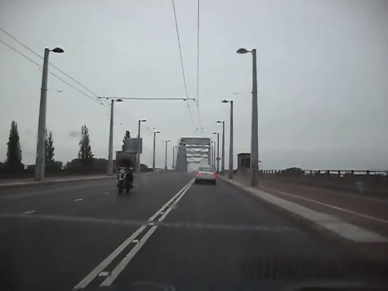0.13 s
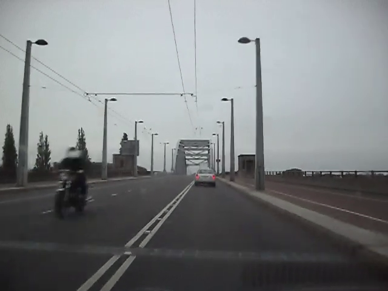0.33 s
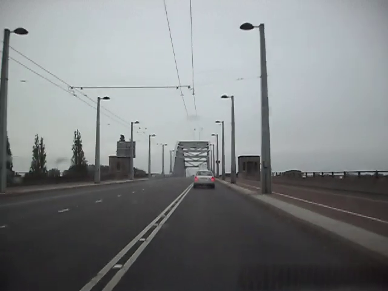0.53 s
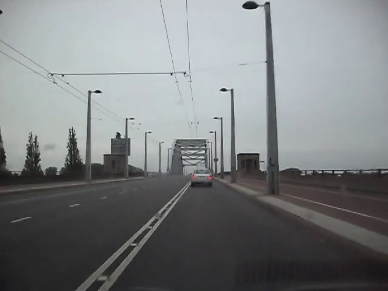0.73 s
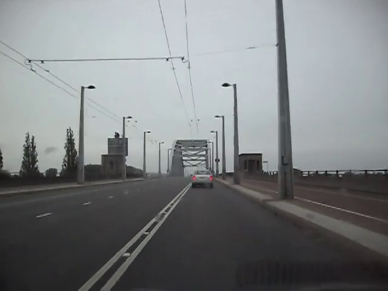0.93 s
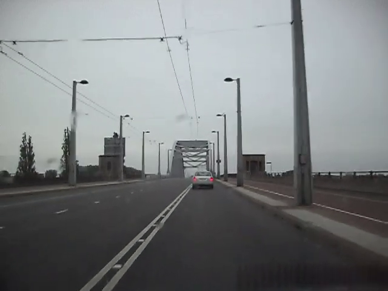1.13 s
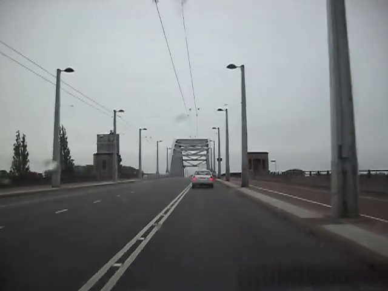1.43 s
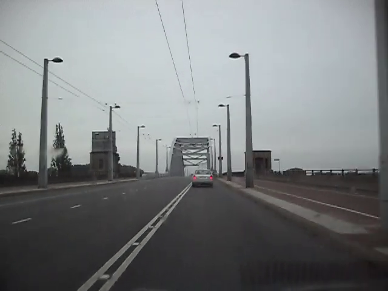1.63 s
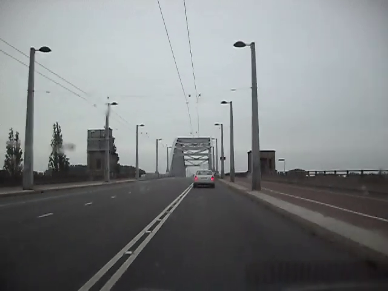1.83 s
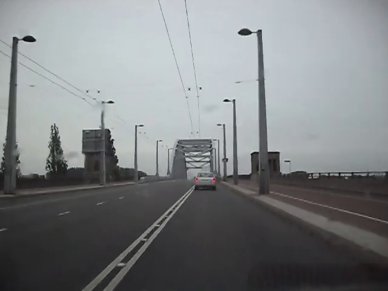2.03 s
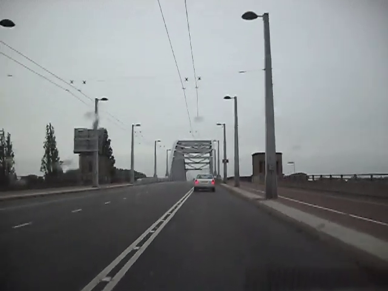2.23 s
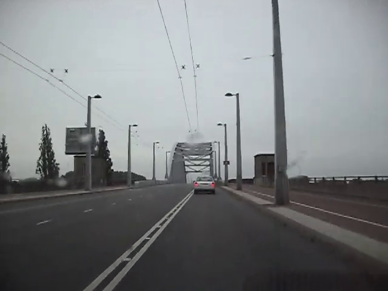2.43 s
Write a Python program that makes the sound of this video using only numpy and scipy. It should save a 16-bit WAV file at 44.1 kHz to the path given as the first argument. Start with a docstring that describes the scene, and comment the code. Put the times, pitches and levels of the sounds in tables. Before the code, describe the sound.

Car cabin driving noise: a steady low engine drone and dull tyre rumble throughout. Wheels hit road joints at about 0.25, 0.45, 0.75 and 0.95 seconds with deep booms and thuds; loose trim knocks near 0.47 and 1.0, the last bump strongest. A motorbike's faint hiss passes around 0.5, falling in pitch. Afterwards smoother rolling continues, with sparse raindrop ticks on glass, faint microphone hiss and thin whine.

```python
"""A steady engine drone over tyre rumble, then booms, rings and knocks as the wheels cross two road joints.
The place is the cabin of a four-cylinder car, cruising onto a bridge in light rain, microphone inside.
Sines make the engine, booms, thuds and trim modes; shaped noise makes the rumble, slaps and cracks.
An oncoming motorbike hisses past as a band of noise dropping in pitch; drops tick on the windscreen
as short noise bursts. The microphone adds hiss and a thin whine."""
import sys
import numpy as np
from scipy import signal
from scipy.fft import rfft, irfft
from scipy.io import wavfile

SR = 44100
rng = np.random.default_rng(int(sys.argv[2]) if len(sys.argv) > 2 else 0)


def put_to_file(sound):
    """Save the sound as 16-bit audio at rate SR, in the file named by the first command-line argument."""
    columns = np.atleast_2d(sound).T  # one column per channel
    safe = np.clip(columns, -1, 1)
    whole_steps = np.round(safe * 32767)
    wavfile.write(sys.argv[1], SR, whole_steps.astype(np.int16))


N = 114660
TIME = np.arange(N) / SR  # [s]

# All noise spectra below are relative: the noise is scaled to an rms of 1 before its level is set.
# microphone hiss spectrum: (frequency [Hz], level per Hz [dB])
HISS_SPECTRUM = [(500, 14), (3000, -4), (6500, 1), (8000, 1), (9800, 6), (11000, -4)]
# microphone hiss over time: (time [s], level [dB])
HISS_LEVEL = [(0, -57), (.4, -57.5), (1.0, -60), (1.15, -62), (2.2, -61.5), (2.6, -59.5)]
HISS_TOP_HZ, WHINE_HZ, WHINE_DB = 10350, 7170, -75

# single raindrops on the windscreen: (time [s], level [dB], treble tilt [dB])
DROPS = [(0.0575, -43.5, 3), (.216, -44.5, 4), (0.2837, -35.5, 0), (.505, -46, -16), (0.512, -43.5, 12),
         (.5525, -45, -5), (.8106, -43, -7), (0.84, -44.5, -1), (.9652, -45, 1), (1.28, -41, 5),
         (1.4223, -42.5, 0), (1.539, -44.5, -13), (1.5438, -45, 13), (1.6636, -45, -1), (1.675, -43.5, -3),
         (1.9301, -48.5, 2), (2.033, -47.5, 4), (2.058, -41, 0), (2.214, -44, -4), (2.263, -48, 0),
         (2.416, -47, -2), (2.53, -48.5, 13)]
# colour of a drop on the glass: (frequency [Hz], level per Hz [dB])
DROP_SPECTRUM = [(600, -21), (1500, 6), (3200, 5), (5000, -2), (7500, -3.5), (10500, -1.5)]
DROP_T60_S = 0.018
DRIZZLE_PER_S, DRIZZLE_DB, DRIZZLE_SPREAD_DB = 50, -61, 5.5

# passing motorbike: loudest moment and width, then the hiss and the spray
PASS_S, PASS_WIDTH_S = 0.49, 0.19
PASS_DB, PASS_HZ, PASS_BAND_HZ = -54, 2920, 680
SPRAY_DB, SPRAY_HZ, SPRAY_BAND_HZ = -7, 1900, 760  # level relative to the hiss
DOPPLER_SHARE, DOPPLER_S, DOPPLER_TURN_S = 0.115, 0.6, 0.088

# tyre rumble through the body: (frequency [Hz], level per Hz [dB])
RUMBLE_SPECTRUM = [(21, 4.5), (27, -4), (48, -2), (62, -2), (82, -13), (100, 0), (140, -8), (180, -13.5),
                   (250, -22.5), (400, -27.5), (560, -38.5)]
# rumble over time: (time [s], level [dB])
RUMBLE_LEVEL = [(0, -26), (.2, -34.5), (.3, -24), (.55, -30.5), (.67, -29.5), (.8, -26), (1.1, -28.5),
                (1.45, -33), (1.85, -30.5), (2.08, -33.5), (2.3, -31.5), (2.6, -29)]
# tread and wind noise: (frequency [Hz], level per Hz [dB])
TREAD_SPECTRUM = [(300, -3.5), (470, 5), (620, -2), (900, 1), (1300, -6.5), (2000, -11.5), (3200, -13.5),
                  (4500, -19), (10000, -25.5)]
# tread noise over time: (time [s], level [dB])
TREAD_LEVEL = [(0, -48), (.18, -46.5), (.27, -44), (.39, -47), (.55, -45), (.72, -46), (1.03, -47.5),
               (1.12, -51), (1.6, -49.5), (2.25, -51), (2.6, -48)]
# narrow resonances of the rolling tyres: (frequency [Hz], width [Hz], level relative to tread noise [dB])
TYRE_TONES = [(241.7, 27.7, 2.5), (447, 32, -7), (933.6, 58, -10)]

# engine firing rate: (time [s], rate [Hz])
FIRING_RATE = [(0, 74.83), (.7, 74.89), (1.3, 74.11), (2.0, 73.78), (2.6, 74.3)]
# engine overtones: (multiple of the four-stroke cycle rate, relative level [dB])
ORDERS = [(6, -7.5), (8, -9.5), (12, -19), (13, -22), (16, -18), (17, -21.5), (18, -18.5), (19, -24),
          (20, -23.5), (23, -26), (24, -34.5), (26, -29), (27, -33.5)]
# engine load, as the relative level of the overtones: (time [s], level [dB])
LOAD = [(0, 5.5), (1.0, -3), (1.2, -4), (1.6, -3.5), (1.9, 1), (2.6, 0.5)]
DRONE_DB, DRONE_WAVER_DB = -30.5, 0.5
ORDERS_DB, ORDER_WAVER_DB, WAVER_HZ = -34, 3, 5

# loose trim knocks: (time [s], body level before the mode levels [dB], crack level [dB])
KNOCKS = [(0.4664, -46, -42), (0.4739, -52, -39.5), (.4785, -41, -39), (0.481, -42.5, -36),
          (0.9998, -27, -35), (1.0055, -41, -50)]
# modes of the trim: (frequency [Hz], relative level [dB], t60 [s])
TRIM_MODES = [(452, -2, 0.056), (566, -6.5, 0.056), (660, -8, 0.032), (856, -2.5, 0.059), (948, -0.5, 0.05),
              (1042, -3, 0.05), (1140, -10, 0.041), (1500, -12, 0.062), (1623, -11, 0.042),
              (2530, -29, 0.039), (5120, -8.5, 0.013)]
TRIM_SPREAD_DB = 1.6
# crack of the trim: (frequency [Hz], level per Hz [dB])
CRACK_SPECTRUM = [(300, -7), (1000, 3), (2500, 0.5), (5500, -7), (8500, -5), (11000, -3.5)]
CRACK_T60_S = 0.03

# cabin booms, one per axle and joint: (start time [s], peak level [dB], frequency [Hz], time to peak [s])
BOOMS = [(.247, -14.5, 50.2, .09), (.459, -18, 49.4, 0.07), (.768, -15, 46.54, 0.07),
         (0.976, -8, 43.2, 0.021)]
BOOM_SHARPNESS = 3.3
# tyres strike the edges of the joints: (start time [s], thud level [dB], thud frequency [Hz],
# air-cavity ring level [dB], tread slap level [dB], slap rise [s])
STRIKES = [(0.24, -24, 128.8, -33, -43.5, 0.018), (.445, -21, 144.3, -24.5, -43.5, 0.018),
           (.49, -14, 113, -46, -45.5, 0.028), (0.754, -19, 132, -39.5, -41.5, 0.018),
           (0.947, -12.5, 119.4, -53, -41.5, 0.016), (.985, -24, 111, -48, -42, 0.026)]
THUD_RISE_S, THUD_SHARPNESS = 0.016, 2.2
CAVITY_HZ, CAVITY_RISE_S, CAVITY_SHARPNESS = 235.7, 0.04, 3
PANEL_DB = -14.5  # relative to the thud
PANEL_HZ, PANEL_RISE_S, PANEL_SHARPNESS = 135.3, 0.073, 5.2
# tread slap: (frequency [Hz], level per Hz [dB])
SLAP_SPECTRUM = [(150, 1), (300, -4), (550, -2.5), (850, 0), (1300, -8), (2500, -28), (8000, -30)]
# shudder of the body after each strike: (frequency [Hz], level per Hz [dB])
SHUDDER_SPECTRUM = [(22, -4), (35, 2.5), (70, 3), (115, -1.5), (180, -6), (215, -20.5), (400, -25)]
SHUDDER_DB, SHUDDER_RISE_S, SHUDDER_SHARPNESS = -21, 0.025, 1.7
# the suspension clunks once, shortly before the rear axle meets the first joint
CLUNK_S, CLUNK_DB, CLUNK_HZ, CLUNK_RISE_S, CLUNK_SHARPNESS = 0.4, -34, 835, 0.0076, 1.7

TOP_SOFTEN_HZ, CUTOFF_HZ = 10300, 12000


def from_db(db):
    """Decibels to gain."""
    return 10 ** (np.asarray(db) / 20)


def rms_one(x):
    """Scale to an rms of 1."""
    return x / np.sqrt(np.mean(x ** 2) + 1e-20)


def in_time(rows):
    """A control curve at every sample."""
    return np.interp(TIME, *np.transpose(rows))


def shaped(gain):
    """Noise of rms 1 whose spectrum follows gain(Hz)."""
    hz = np.maximum(np.arange(N // 2 + 1) * SR / N, 1)
    return rms_one(irfft(rfft(rng.standard_normal(N)) * gain(hz), N))


def noise(spectrum, top_hz=CUTOFF_HZ):
    """Noise with a given spectrum, falling away beyond its ends and steeply above top_hz."""
    f, db = np.transpose(spectrum)

    def gain(hz):
        inside = from_db(np.interp(np.log(hz), np.log(f), db))
        below = np.minimum(hz / f[0], 1) ** 2
        above = np.minimum(f[-1] / hz, 1) ** 3
        steep_top = 1 / np.sqrt(1 + (hz / top_hz) ** 90)
        return inside * below * above * steep_top

    return shaped(gain)


def band(hz, width):
    """Noise in one resonance with steep skirts, 12 dB down at width; at 0 Hz, a slow drift."""
    return shaped(lambda f: 1 / (1 + ((f - hz) / width) ** 2) ** 2)


def swell(s, rise, sharpness=1):
    """Envelope that starts at s, reaches 1 after the rise and dies away."""
    u = np.maximum(TIME - s, 0) / rise
    return (u * np.exp(1 - u)) ** sharpness


def fade(s, t60):
    """Envelope that jumps to 1 at s and decays by 60 dB in t60."""
    return (TIME >= s) * np.exp(-np.log(1000) * np.clip((TIME - s) / t60, 0, 10))


def sine(s, hz):
    """A vibration with zero phase at s."""
    return np.sin(2 * np.pi * hz * (TIME - s))


def microphone():
    """Self-noise of the microphone: shaped hiss and a thin electrical whine."""
    hiss = from_db(in_time(HISS_LEVEL)) * noise(HISS_SPECTRUM, top_hz=HISS_TOP_HZ)
    whine = np.sqrt(2) * from_db(WHINE_DB) * sine(0, WHINE_HZ)
    return hiss + whine


def rain():
    """Drops tick on the glass as decaying splash noise, single ones among a fine random drizzle."""
    splash = noise(DROP_SPECTRUM)
    lowpass = signal.butter(2, 5000, fs=SR, output="sos")
    dull = signal.sosfiltfilt(lowpass, splash)
    bright = splash - dull
    drops = np.zeros(N)
    for s, db, tilt in DROPS:
        tick = from_db(db - tilt / 2) * dull + from_db(db + tilt / 2) * bright
        drops += fade(s, DROP_T60_S) * tick
    lands = rng.random(N) < DRIZZLE_PER_S / SR
    speck_db = DRIZZLE_DB + DRIZZLE_SPREAD_DB * np.minimum(rng.exponential(1, N), 2)
    specks = lands * from_db(speck_db)
    keep = np.exp(-np.log(1000) / (DROP_T60_S * SR))  # decay per sample
    drizzle = signal.lfilter([1], [1, -keep], specks + 1e-18) * splash
    return drops + drizzle


def motorbike():
    """A band of wet-tyre hiss, with broader spray below it, swells and drops in pitch as it goes by."""
    source = band(PASS_HZ, PASS_BAND_HZ) + from_db(SPRAY_DB) * band(SPRAY_HZ, SPRAY_BAND_HZ)
    # Doppler: the source is read fast on approach and slowly on departure
    speed = 1 - DOPPLER_SHARE * np.tanh((TIME - DOPPLER_S) / DOPPLER_TURN_S)
    hiss = np.interp(np.cumsum(speed), np.arange(N), source, period=N)
    closeness = 1 / (1 + ((TIME - PASS_S) / PASS_WIDTH_S) ** 4)
    return from_db(PASS_DB) * hiss * closeness


def tyres():
    """Rolling tyres: rumble through the body, tread noise and narrow resonances, all from noise."""
    rumble = from_db(in_time(RUMBLE_LEVEL)) * noise(RUMBLE_SPECTRUM)
    tread = noise(TREAD_SPECTRUM)
    for hz, width, db in TYRE_TONES:
        tread += from_db(db) * band(hz, width)
    return rumble + from_db(in_time(TREAD_LEVEL)) * tread


def engine():
    """A steady drone at the firing rate; wavering overtones of the cycle follow the load."""
    # four cylinders fire once each per four-stroke cycle
    cycle = 2 * np.pi * np.cumsum(in_time(FIRING_RATE)) / SR / 4
    drone_gain = from_db(DRONE_DB + DRONE_WAVER_DB * band(0, WAVER_HZ))
    drone = drone_gain * np.sin(4 * cycle)
    overtones = np.zeros(N)
    for multiple, db in ORDERS:
        gain = from_db(db + ORDER_WAVER_DB * band(0, WAVER_HZ))
        overtones += gain * np.sin(round(multiple) * cycle + 2 * np.pi * rng.random())
    loaded = from_db(ORDERS_DB + in_time(LOAD)) * overtones
    return np.sqrt(2) * (drone + loaded)  # sine levels are rms


def trim():
    """Loose plastic is jolted by the rear axle: short noise cracks and damped sine modes."""
    out = np.zeros(N)
    crack = noise(CRACK_SPECTRUM)
    for s, body_db, crack_db in KNOCKS:
        out += from_db(crack_db) * fade(s, CRACK_T60_S) * crack
        for hz, db, t60 in TRIM_MODES:
            gain = from_db(body_db + db + rng.normal(0, TRIM_SPREAD_DB))
            out += gain * rng.choice([-1, 1]) * fade(s, t60) * sine(s, hz)
    return out


def joints():
    """Each edge gives a thud, a shudder, a panel and a tyre ring and a slap; each axle makes the cabin boom."""
    out = np.zeros(N)
    for s, db, hz, rise in BOOMS:
        out += from_db(db) * swell(s, rise, BOOM_SHARPNESS) * sine(s, hz)
    slap, shudder = noise(SLAP_SPECTRUM), noise(SHUDDER_SPECTRUM)
    for s, thud_db, thud_hz, ring_db, slap_db, slap_rise in STRIKES:
        out += from_db(thud_db) * swell(s, THUD_RISE_S, THUD_SHARPNESS) * sine(s, thud_hz)
        out += from_db(SHUDDER_DB) * swell(s, SHUDDER_RISE_S, SHUDDER_SHARPNESS) * shudder
        panel = swell(s, PANEL_RISE_S, PANEL_SHARPNESS) * sine(s, PANEL_HZ)
        out += from_db(thud_db + PANEL_DB) * panel
        out += from_db(ring_db) * swell(s, CAVITY_RISE_S, CAVITY_SHARPNESS) * sine(s, CAVITY_HZ)
        out += from_db(slap_db) * swell(s, slap_rise) * slap
    clunk = swell(CLUNK_S, CLUNK_RISE_S, CLUNK_SHARPNESS) * sine(CLUNK_S, CLUNK_HZ)
    return out + from_db(CLUNK_DB) * clunk


def scene():
    """Everything as heard behind the windscreen, summed to one channel."""
    background = microphone() + rain() + motorbike()
    car = tyres() + engine() + trim() + joints()
    return (background + car)[None]


def record(dry):
    """The top is softened by one low-pass filter, then cut steeply by another."""
    soften = signal.butter(10, TOP_SOFTEN_HZ, fs=SR, output="sos")
    cut = signal.ellip(10, 0.2, 80, CUTOFF_HZ, fs=SR, output="sos")  # ripple and stopband [dB]
    return signal.sosfilt(cut, signal.sosfilt(soften, dry))


dry = scene()
out = record(dry)
put_to_file(out)
```